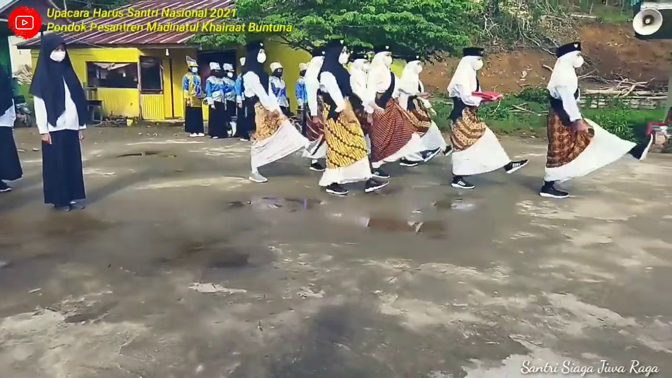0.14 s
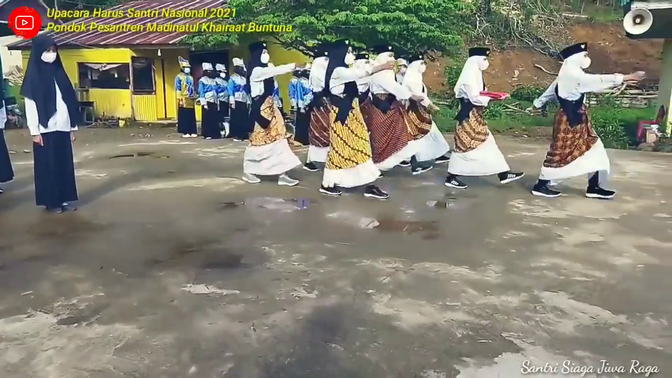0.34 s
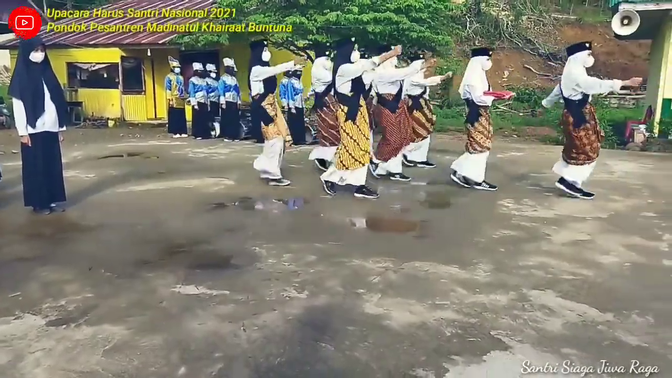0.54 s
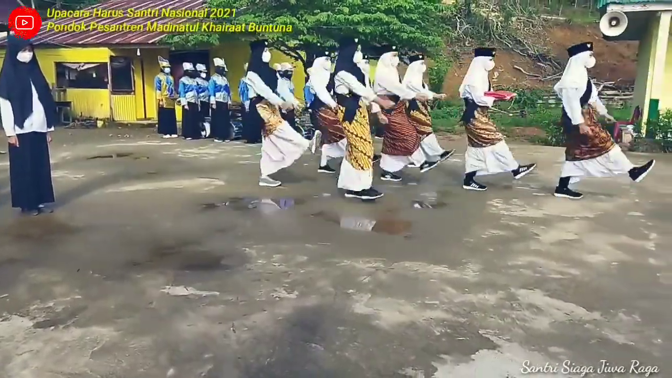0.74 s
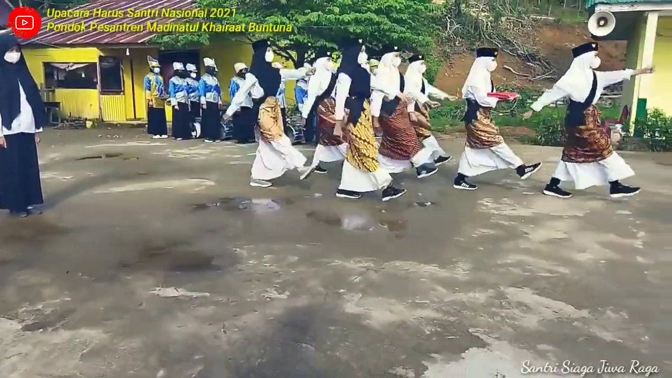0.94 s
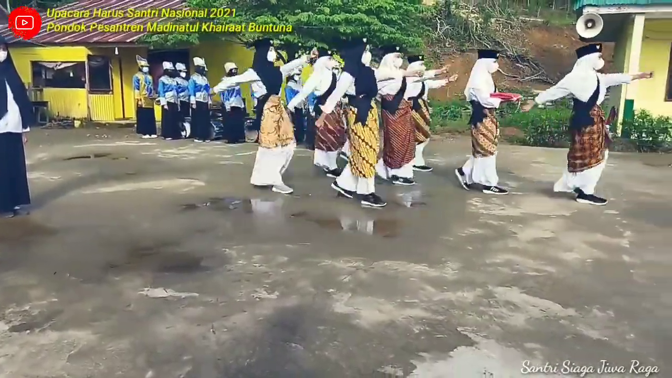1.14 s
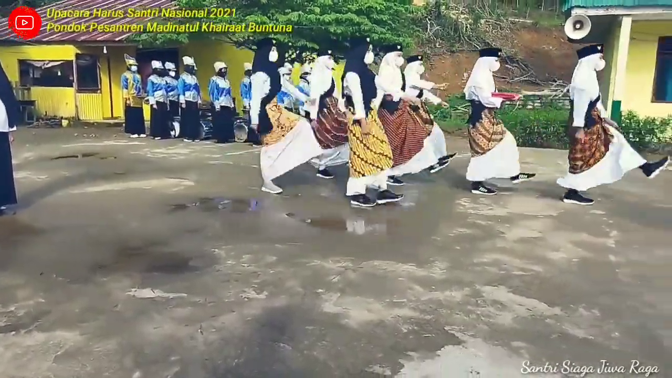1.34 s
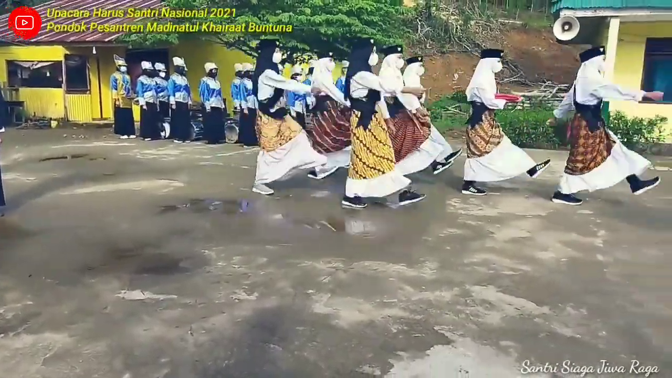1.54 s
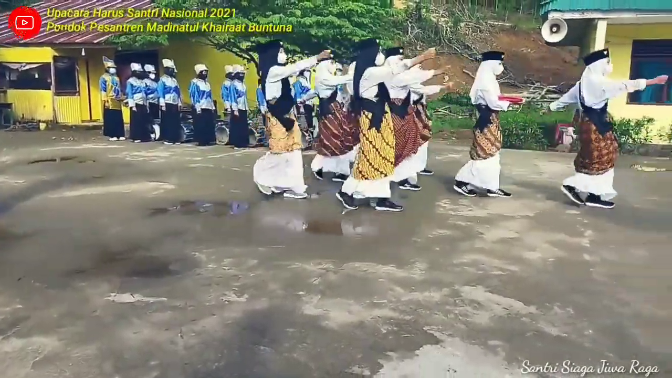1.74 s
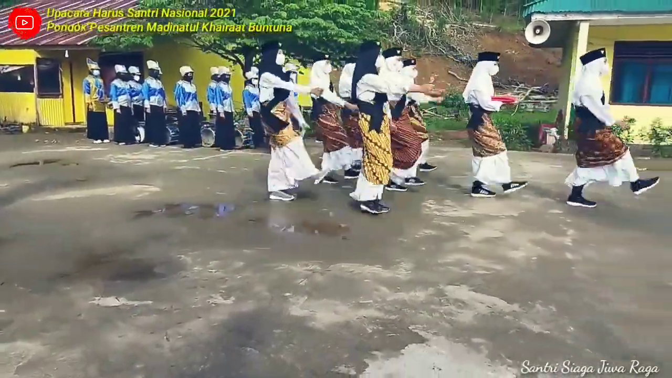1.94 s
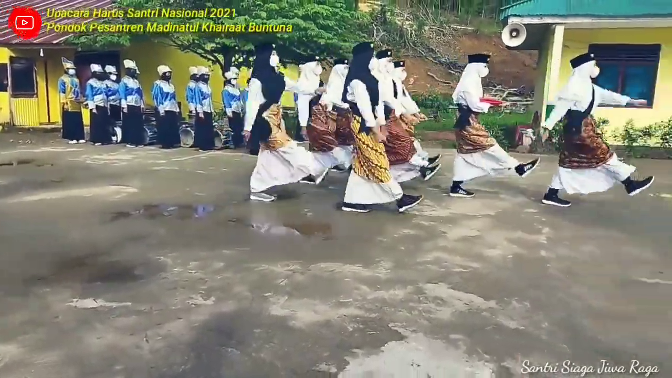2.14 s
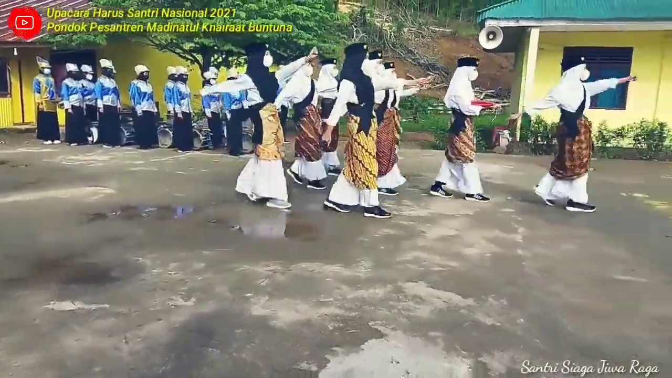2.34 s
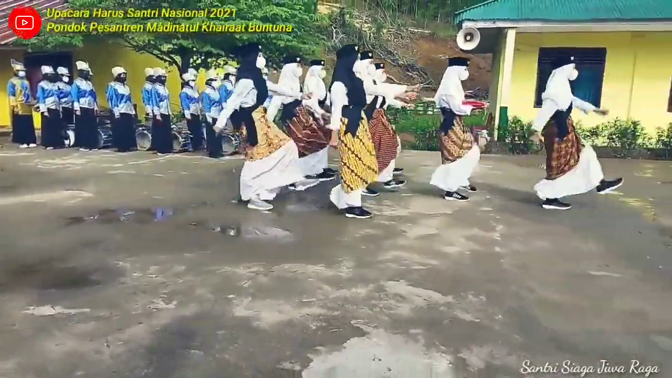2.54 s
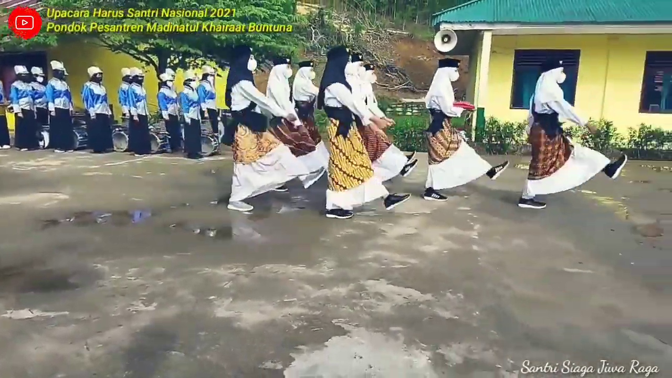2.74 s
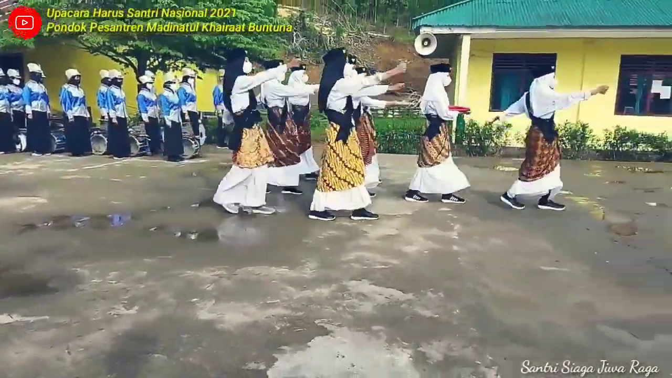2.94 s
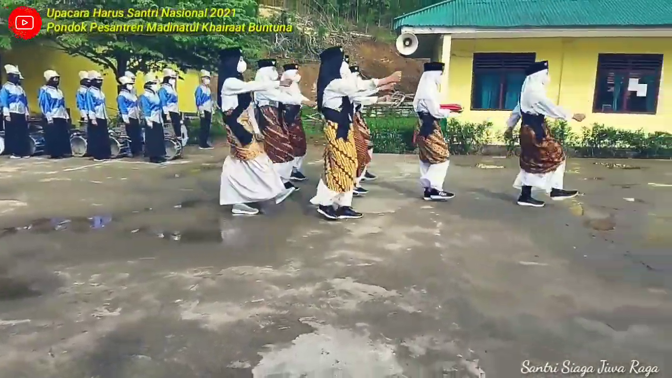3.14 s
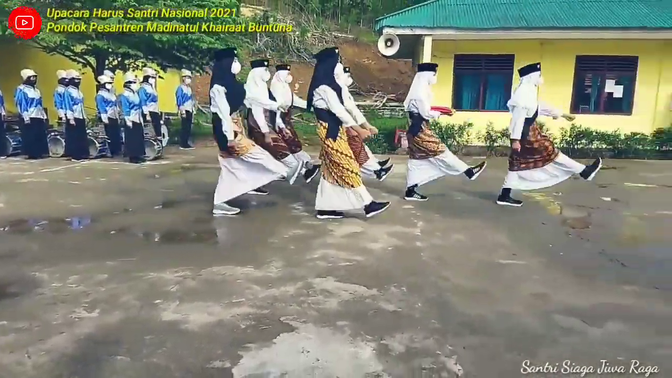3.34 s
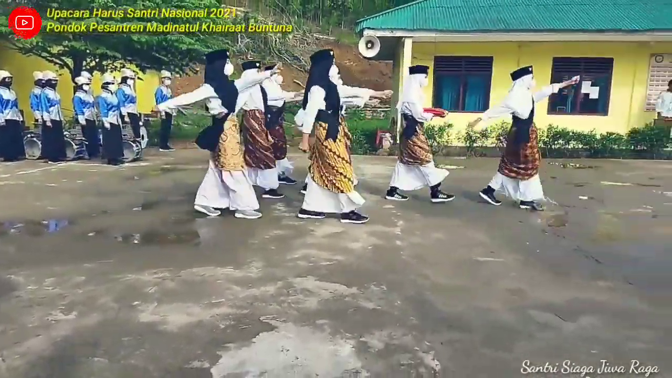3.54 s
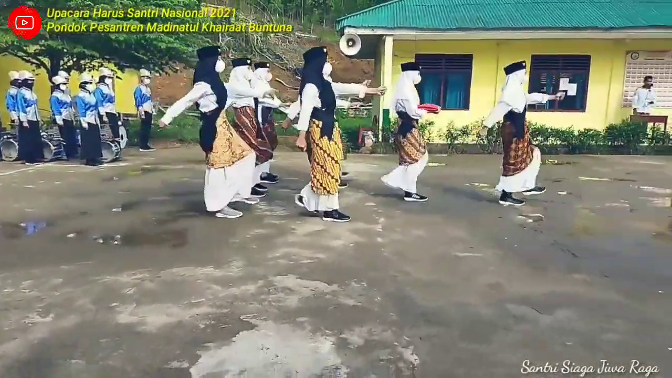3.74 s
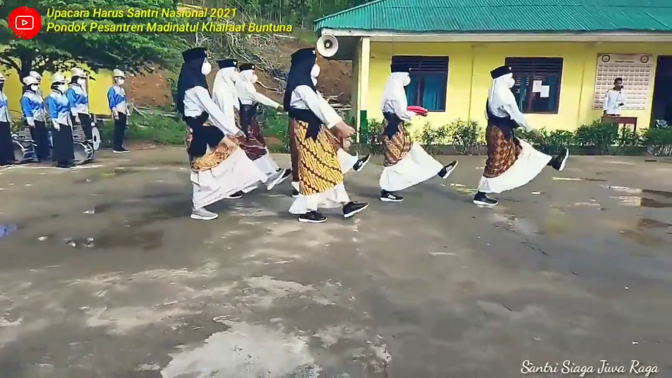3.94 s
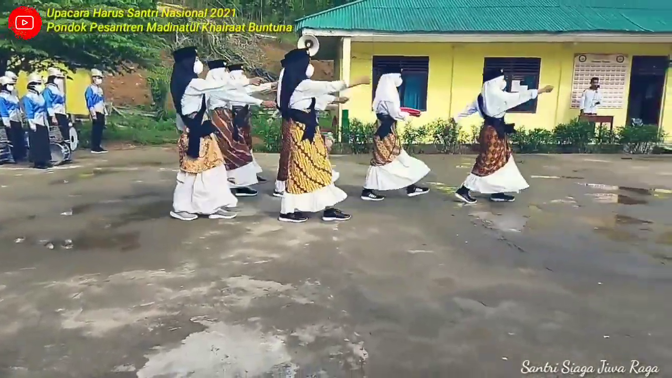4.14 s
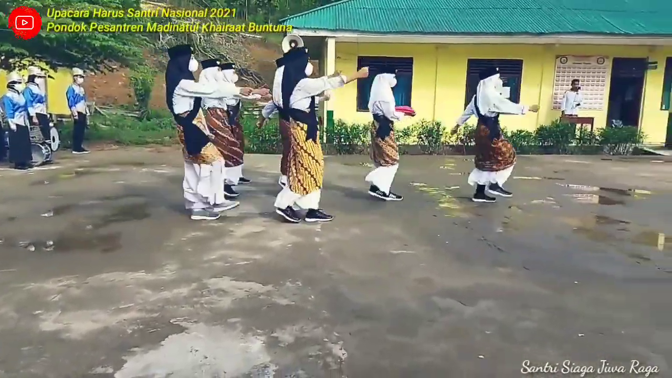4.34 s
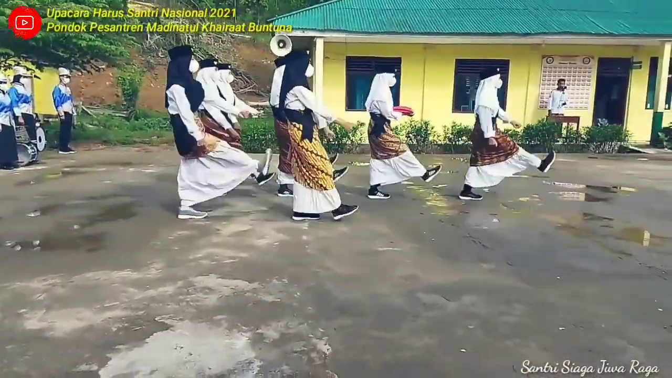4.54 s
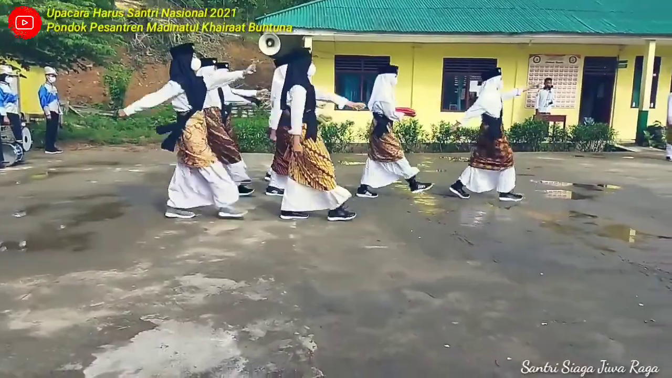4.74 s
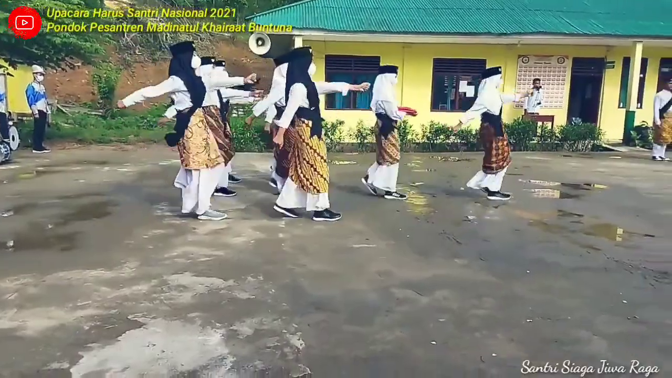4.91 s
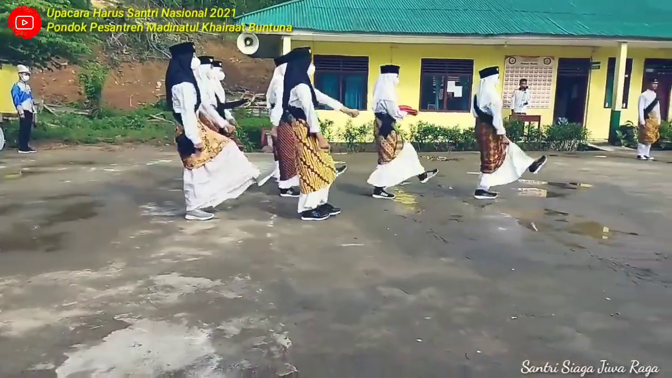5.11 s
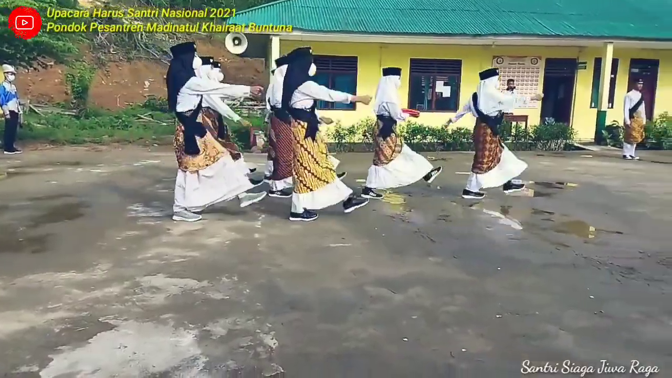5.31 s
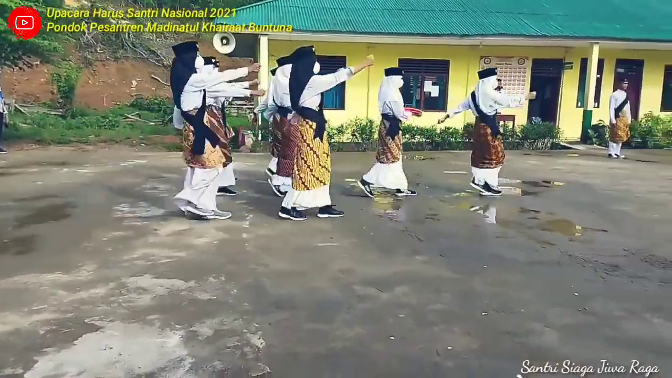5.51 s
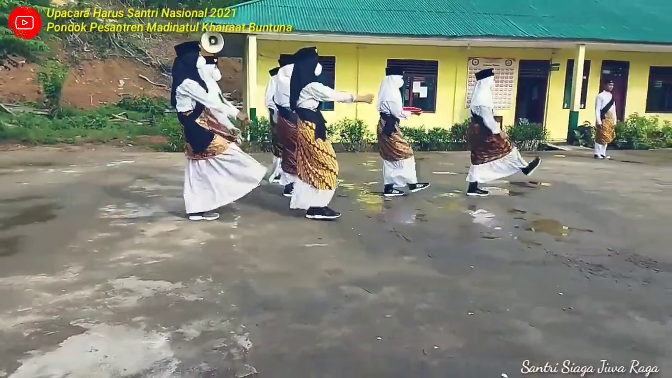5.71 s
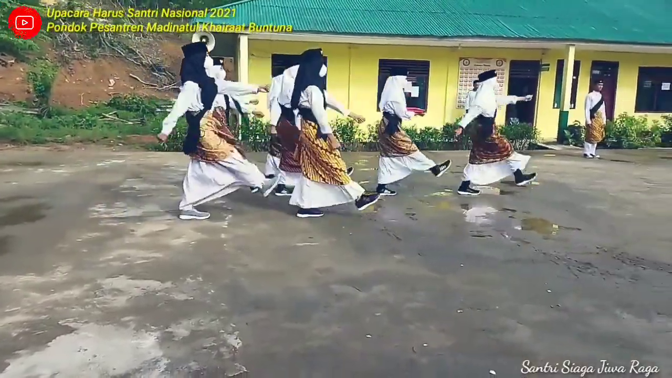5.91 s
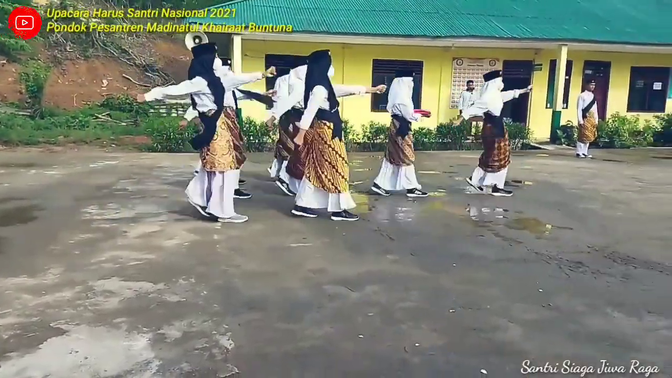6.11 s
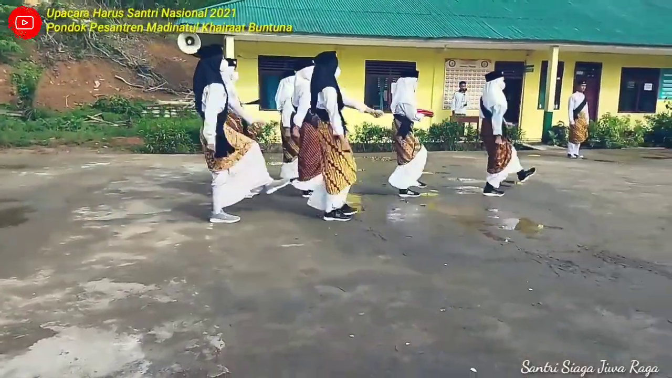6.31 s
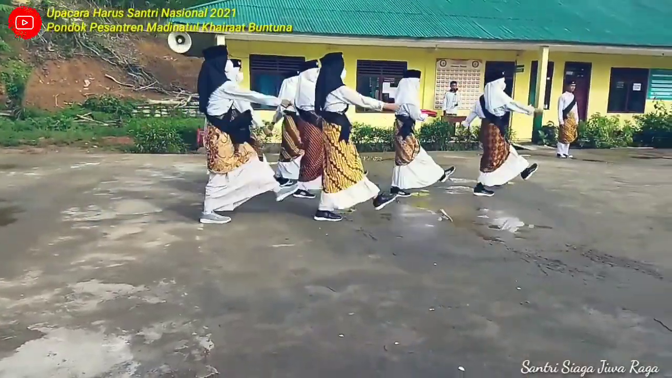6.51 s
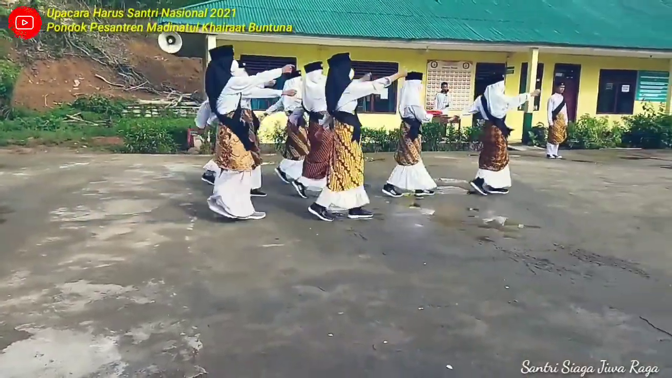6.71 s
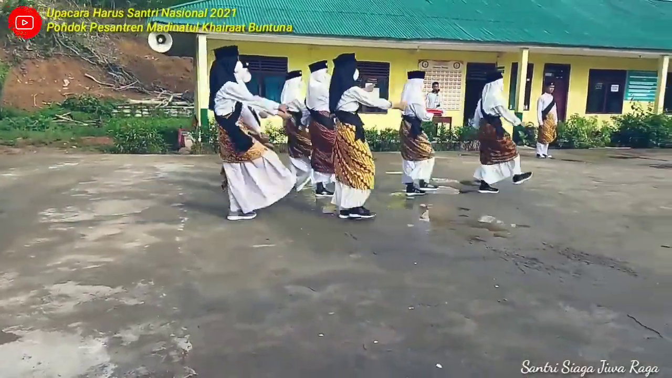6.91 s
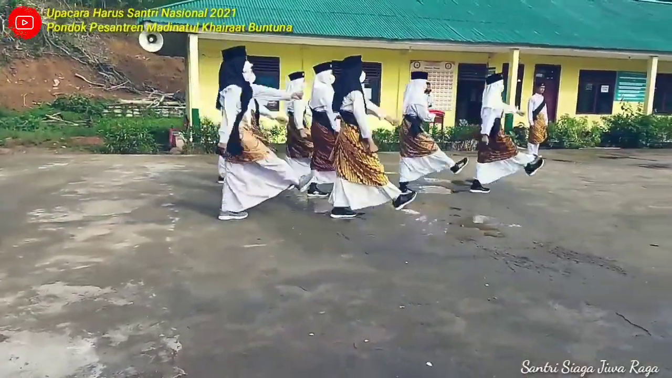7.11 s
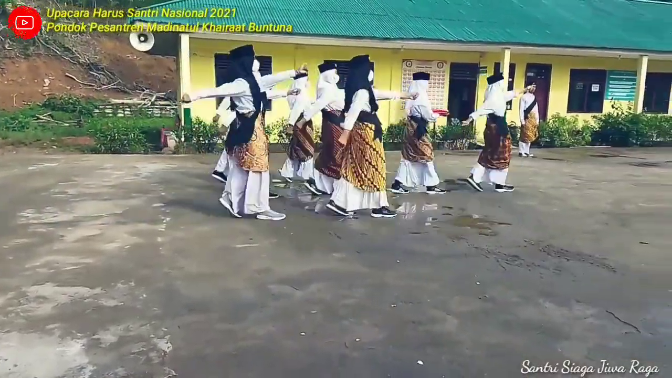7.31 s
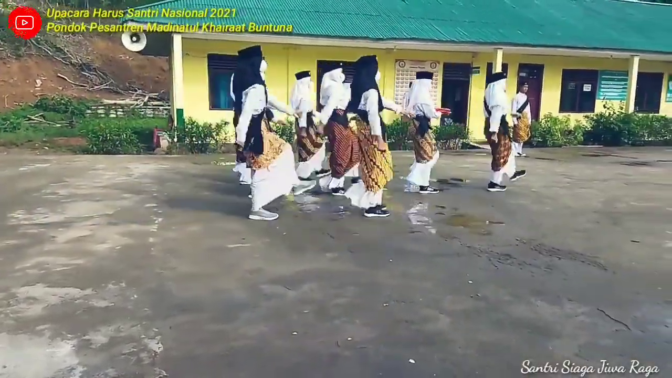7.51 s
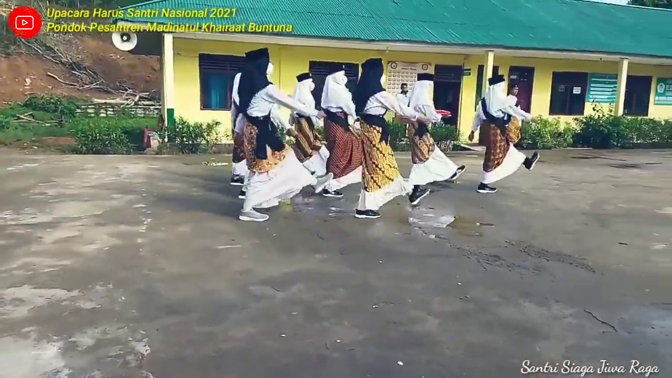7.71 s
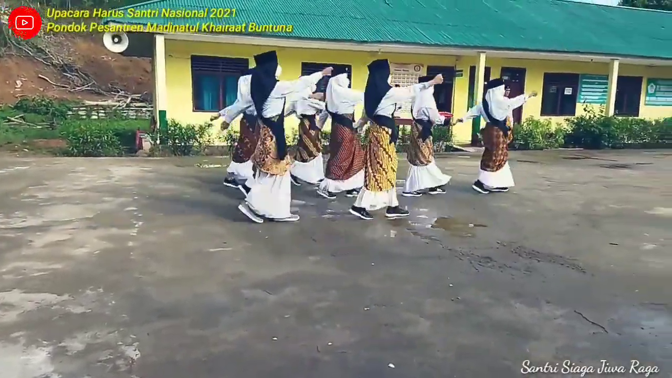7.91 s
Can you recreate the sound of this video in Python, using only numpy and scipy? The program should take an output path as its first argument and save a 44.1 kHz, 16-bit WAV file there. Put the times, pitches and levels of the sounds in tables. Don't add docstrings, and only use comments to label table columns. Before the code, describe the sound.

Outdoors on a damp concrete yard between low buildings, a squad in rubber-soled shoes marches in unison. A faint scuff opens over soft air hiss, distant lumpy rumble and a barely audible drone. The first beat lands at 0.4 s, then one about every 0.62 s: 1.1, 1.7, 2.3, 2.9, 3.6, 4.2, 4.8, 5.4, 6.0, 6.6, 7.3 and 7.9 s. Each is a ragged cluster of heel clicks, sole slaps and crushed grit above a low push, followed by a short dull echo. The 4.8 s beat has the sharpest click. A soft microphone bump comes near 1.3 s. Scuffs and cloth swishes fill gaps, notably around 1.8, 2.6, 3.8 and 5.2 s; a pebble ticks at 5.6 s. Faint bird whistles and far low hoots are scattered, with more chirps around 6.4 and 7.5 s. The last step is cut off at about 8 s.

```python
import sys
import numpy as np
from scipy import signal
from scipy.fft import rfft, irfft
from scipy.io import wavfile

SR = 44100
rng = np.random.default_rng(int(sys.argv[2]) if len(sys.argv) > 2 else 0)


def rack_gain(trim_db):
    fader = np.asarray(trim_db, float)
    return 10 ** (fader / 20)


def master(y):
    cut = np.clip(np.atleast_2d(y).T, -1, 1)
    pcm = np.round(cut * 32767)
    wavfile.write(sys.argv[1], SR, pcm.astype(np.int16))


N = 351036

# start_s, spread_s, one_sole_db, slab_weight_db
BEATS = [(0.427, 0.042, -28.5, -31.5), (1.063, 0.045, -33, -26.5), (1.688, 0.053, -29.5, -32.5),
         (2.311, 0.063, -31.5, -29.5), (2.945, 0.048, -29.5, -30), (3.571, 0.035, -33.5, -29),
         (4.187, 0.04, -28, -28), (4.787, 0.086, -31, -26.5), (5.409, .058, -30, -28),
         (6.036, 0.081, -38, -27), (6.647, 0.068, -29.5, -27.5), (7.274, 0.029, -40, -28),
         (7.885, 0.06, -33.5, -29.5)]
# time_s, level_db
BUSTLE = [(0, 4.5), (.3, 1.5), (1.3, -0.5), (2, 3.5), (2.85, -1.5), (3.75, 3), (4.1, 0), (5.0, 5),
          (5.65, 4.5), (6.0, -2), (6.85, 4), (7.2, 3), (7.96, 5)]
# pitch_hz, width_hz, level_db
HEEL_MODES = [(454, 160, 0), (869, 435, 2.5), (1038, 670, 0)]
# pitch_hz, width_hz, level_db
GRIT_MODES = [(5370, 3800, -12.5), (8380, 1080, 2.5), (10560, 4160, 0.5), (11970, 2900, 1),
              (15900, 1170, 2)]


def rms_one(x):
    return x / np.sqrt(np.mean(x ** 2) + 1e-20)


def flicker(per_s):
    knots = rng.standard_normal(int(per_s * N / SR) + 2)
    return np.interp(np.arange(N) * per_s / SR, np.arange(len(knots)), knots)


def coloured(spectrum):
    hz, level_db = np.transpose(spectrum)
    bins = np.maximum(np.arange(N // 2 + 1) * SR / N, 1)
    gain = rack_gain(np.interp(np.log(bins), np.log(hz), level_db))
    return rms_one(irfft(rfft(rng.standard_normal(N)) * gain, N))


def resonate(x, modes):
    out = 0
    both = np.stack([x + 1e-18, np.arange(len(x)) == 0])
    for k, (hz, width, level_db) in enumerate(modes):
        r = np.exp(-np.pi * width / SR)
        b = (1 - r * r) / 2 * np.array([1, 0, -1])
        a = [1, -2 * r * np.cos(2 * np.pi * hz / SR), r * r]
        out = out + (-1) ** k * rack_gain(level_db) * signal.lfilter(b, a, both)
    return out[0] / np.sqrt(np.sum(out[1] ** 2))


def grains(per_s, spread_db):
    sizes = rack_gain(spread_db * np.minimum(rng.exponential(1, N), 3.3)) * rng.choice([-1, 1], N)
    return rms_one(sizes * (rng.random(N) < per_s / SR))


def glides(bands):
    out, white = np.zeros(N), rng.standard_normal((2, N))
    flutter = rack_gain(2.5 * flicker(per_s=90))
    lead = 2000
    for s, length, from_hz, to_hz, width, level_db in bands:
        i, count = int(s * SR), int(length * SR)
        r = np.exp(-np.pi * width / SR)
        noise = white[0, i - lead:i + count] + 1j * white[1, i - lead:i + count]
        wander = signal.lfilter([1], [1, -2 * r, r * r], noise)[lead:]
        carrier = np.exp(2j * np.pi * np.cumsum(np.linspace(from_hz, to_hz, count)) / SR)
        swell = np.hanning(count) ** 0.18 * flutter[i:i + count]
        out[i:i + count] += rack_gain(level_db) * swell * rms_one(np.real(wander * carrier))
    return out


def bustle_db():
    return np.interp(np.arange(N) / SR, *np.transpose(BUSTLE))


def air_hiss(air, busy):
    high = signal.sosfiltfilt(signal.butter(2, 910, "high", fs=SR, output="sos"), air)
    return rack_gain(-56.5 + 0.28 * busy + 1.1 * flicker(per_s=18)) * rms_one(high)


def murk(air, busy):
    later_s, width_s, swell_db = 0.21, 0.13, 5.7
    t = np.arange(N) / SR
    swell = sum(np.exp(-((t - beat[0] - later_s) / width_s) ** 2) for beat in BEATS)
    edges, patches = np.geomspace(150, 1200, 9), 0
    for low, high in zip(edges, edges[1:]):
        band = signal.butter(2, [low, high], "band", fs=SR, output="sos")
        patches = patches + rack_gain(4.2 * flicker(per_s=13)) * signal.sosfiltfilt(band, air)
    return rack_gain(-67 + 0.98 * busy + swell_db * swell) * rms_one(patches)


def rumble(busy):
    # pitch_hz, level_db (per Hz)
    rumble_spectrum = [(7.1, -48), (12, 2.5), (25, -12), (38, -16.5), (59, -10.5), (120, -13), (232, -27.5),
                       (269, -25.5), (400, -33.5), (520, -80), (880, -120)]
    return rack_gain(-50.5 + 0.47 * busy + 1.8 * flicker(per_s=10)) * coloured(rumble_spectrum)


def background():
    # pitch_hz, level_db (per Hz)
    air_spectrum = [(130, -31), (200, -0.5), (400, 5), (780, -3), (1100, -5), (1900, -6.5), (3300, -8.5),
                    (6200, -17), (7300, -13.5), (8300, -5.5), (9400, -12), (10300, -9.5), (11300, -22),
                    (15600, -12.5)]
    air, busy = coloured(air_spectrum), bustle_db()
    return air_hiss(air, busy) + murk(air, busy) + rumble(busy)


def murmur():
    hz, sway_hz, width_hz, level_db = 770, 60, 150, -70
    r = np.exp(-np.pi * width_hz / SR)
    wander = signal.lfilter([1], [1, -2 * r, r * r], rng.standard_normal((2, N)))
    carrier = np.exp(2j * np.pi * np.cumsum(hz + sway_hz * flicker(per_s=5)) / SR)
    drone = rms_one(np.real((wander[0] + 1j * wander[1]) * carrier))
    return rack_gain(level_db + bustle_db() + 3.3 * flicker(per_s=7)) * drone


def hoots():
    # start_s, length_s, pitch_hz, level_db
    calls = [(1.48, 0.1, 816, -71), (4.566, 0.11, 740, -64), (5.154, 0.094, 253, -58),
             (5.251, 0.15, 754, -64), (5.856, 0.13, 753, -60), (6.267, 0.058, 770, -55),
             (6.372, 0.048, 900, -60), (6.379, 0.089, 131, -52), (7.6, 0.11, 858, -58),
             (5.571, 0.077, 900, -63), (6.42, .1, 249, -61.5), (6.842, .11, 735, -59.5),
             (7.48, .05, 833, -58), (7.567, 0.045, 427, -56), (7.781, .09, 732, -61)]
    return glides([(s, length, hz, hz, 0.13 * hz, db) for s, length, hz, db in calls])


def birds():
    whistle_width_hz, chirp_width_hz = 200, 450
    # start_s, length_s, from_hz, to_hz, level_db
    whistles = [
        (.375, .065, 3660, 3230, -63),
        (1.13, .14, 7800, 4800, -61),
        (3.4, .022, 6800, 5500, -63),
        (4.5, .09, 3650, 3480, -64),
        (4.645, .045, 3550, 3250, -64),
        (5.15, .028, 4200, 4100, -63),
        (6.79, .085, 4900, 8100, -63),
        (6.875, .07, 8100, 6100, -61),
        (6.94, .065, 6200, 5000, -65),
        (7.212, .05, 3300, 3200, -64),
    ]
    # start_s, length_s, from_hz, to_hz, level_db
    chirps = [(3.392, .012, 5400, 6600, -63), (3.415, .02, 2400, 2600, -63), (4.08, .06, 3800, 3600, -65),
              (4.59, .02, 4000, 3900, -66), (5.065, .02, 3900, 3700, -64), (6.352, .015, 5500, 6200, -60),
              (6.367, .022, 6200, 5500, -60), (6.39, .03, 4000, 3900, -61), (6.422, .022, 4600, 3600, -59),
              (7.055, .03, 4400, 4000, -61), (7.435, .03, 5400, 5700, -62), (7.494, .022, 3600, 4800, -57),
              (7.51, .025, 3900, 4100, -62), (7.548, .02, 4300, 4100, -64), (7.565, .018, 3400, 3300, -61),
              (7.648, .028, 4400, 3700, -60), (7.676, .018, 3500, 3400, -61), (7.725, .03, 3300, 3300, -64)]
    bands = [(s, length, a, b, whistle_width_hz, db) for s, length, a, b, db in whistles]
    bands += [(s, length, a, b, chirp_width_hz, db) for s, length, a, b, db in chirps]
    return glides(bands)


def strands(swishes):
    chance, bands = rng.random((len(swishes), 4, 2)), []
    for j, (s, length, hz, db) in enumerate(swishes):
        if length <= .08:
            continue
        for k in range(4):
            start = s + length * (k + chance[j, k, 0]) / 6
            pitch = hz * (1.12 - .07 * k - .1 * chance[j, k, 1])
            bands.append((start, length * .4, pitch, pitch * (1 - .8 * length), .07 * hz, db - 5.5))
    return bands


def cloth():
    # start_s, length_s, pitch_hz, level_db
    swishes = [(0.543, 0.12, 4780, -53), (1.565, .025, 4200, -61.5), (1.825, 0.097, 5000, -53.5),
               (1.849, 0.13, 4300, -55), (3.058, 0.18, 4770, -58), (3.456, 0.021, 4370, -58),
               (4.878, 0.13, 4750, -54.5), (5.208, 0.022, 2106, -43), (5.225, 0.033, 1910, -56),
               (6.444, 0.067, 3110, -62), (6.859, 0.12, 4200, -58), (6.843, 0.098, 5400, -60.5)]
    wide = [(s, length, hz, hz * (1 - length), .32 * hz, db + 0.5) for s, length, hz, db in swishes]
    return glides(wide + strands(swishes))


def bump():
    start_s, from_hz, to_hz, decay_s, level_db = 1.2995, 260, 125, .014, -31
    t = np.maximum(np.arange(N) / SR - start_s, 0)
    hz = (to_hz + (from_hz - to_hz) * np.exp(-t / 0.004)) * (t > 0)
    turn = 2 * np.pi * np.cumsum(hz) / SR
    wobble = np.sin(turn) + 0.31 * np.sin(2 * turn)
    return -rack_gain(level_db) * np.exp(-(t / (2 * decay_s)) ** 2) * wobble


def pebble():
    # start_s, peak_db
    hits = [
        (5.576, -25),
        (5.5805, -28),
    ]
    ticks = np.zeros(N)
    ticks[[round(s * SR) for s, db in hits]] = rack_gain(np.array(hits)[:, 1] + 8)
    return resonate(ticks, [(3220, 990, -0.5), (5000, 710, 2), (8000, 2300, -9)])


def scuffs():
    # start_s, length_s, level_db, grit_over_heel_db
    brushes = [(0.0, 0.05, -52.5, 3), (0.654, 0.021, -52, 14), (0.667, 0.017, -50, 23),
               (0.68, 0.038, -49, 11), (1.19, 0.047, -63, 22), (1.835, .017, -53, 4),
               (1.999, 0.027, -61.5, -18), (2.496, .02, -64, 22), (2.612, 0.021, -47, 13.5),
               (2.634, 0.015, -57.5, 24), (3.279, 0.028, -57, -7), (3.725, 0.026, -55, 16),
               (3.781, 0.025, -50.5, -11.5), (3.839, 0.031, -44.5, 9), (3.869, 0.016, -45.5, 4),
               (4.62, 0.019, -57.5, 2), (5.132, 0.011, -60.5, 42), (5.204, 0.02, -50, 7),
               (7.464, 0.017, -58, 19), (3.953, .008, -57, 12), (1.052, 0.015, -46, 0),
               (1.671, 0.013, -43, 1), (2.922, 0.03, -42.5, -2), (3.55, 0.019, -40.5, -3),
               (6.016, 0.064, -46.5, 4), (7.874, 0.018, -47, -13)]
    # pitch_hz, width_hz, level_db
    sliding_modes = [(1620, 1900, 6), (2500, 2960, 11), (4200, 3700, 3.5)]
    out, rub = np.zeros(N), grains(per_s=14000, spread_db=7) * rack_gain(1.8 * flicker(per_s=250))
    for lean, modes in ((-.5, HEEL_MODES), (0, sliding_modes), (.5, GRIT_MODES)):
        stroke = np.zeros(N)
        for s, length, level_db, tilt_db in brushes:
            part = np.linspace(0, 1.5, max(int(1.5 * length * SR), 8))
            i = max(int(s * SR), 0)
            swell = np.minimum(part / .2, 1) * np.cos(part * np.pi / 3)
            piece = rack_gain(level_db + lean * tilt_db) * swell
            stroke[i:i + len(part)] += piece[:N - i]
        out += resonate(stroke * rub, modes)
    return out


def thuds():
    # pitch_hz, width_hz, level_db
    slab_modes = [(134, 118, -2), (223, 103, 1), (308, 190, -6)]
    late_s, late_db = .048, -2.3
    pushes = np.zeros(N)
    s, spread, level_db, weight_db = np.transpose(BEATS)
    pushes[(s * SR).astype(int)] = rack_gain(weight_db - 8.5)
    pushes[((s + late_s) * SR).astype(int)] = rack_gain(weight_db + late_db - 12.5)
    fall = np.exp(-1 / (0.032 * SR))
    return resonate(signal.lfilter([1], [1, -fall], pushes) * rng.standard_normal(N), slab_modes)


def heel_taps():
    # start_s, peak_db, brightness_db
    taps = [(1.1175, -19, -8), (1.7015, -20, -6), (2.3195, -19, -4), (2.949, -19, -10), (3.5675, -18, -3),
            (4.1835, -21, 2), (4.1848, -24, 9), (2.3355, -18, -14), (2.3235, -18, -6), (4.2435, -17, -8),
            (4.7841, -9.5, -6), (4.8555, -15, -6), (5.4395, -20, -12), (5.462, -18, -2), (6.0355, -21, 3),
            (6.0405, -19, 3), (6.0695, -15, -20), (6.114, -16, -10), (7.2855, -14, -6)]
    s, db, bright_db = np.transpose(taps)
    at = np.round(s * SR).astype(int)
    dull, bright = np.zeros((2, N))
    dull[at] = -rack_gain(db + 9)
    bright[at] = -rack_gain(db + bright_db + 3)
    dull = signal.sosfilt(signal.butter(2, 4000, fs=SR, output="sos"), dull + 1e-18)
    return resonate(dull, [(1400, 1800, 0)]) + resonate(bright, [(8500, 4000, -6), (13500, 4000, 0)])


def soles():
    # start_s, heel_knock_db, sole_slap_db, grit_db
    clear_soles = [(0.48, -33, -29, -38), (1.7427, -33, -34, -38), (2.9246, -34, -36, -40),
                   (2.9963, -28, -30, -35), (4.146, -40, -44, -43), (4.1492, -32, -40, -41),
                   (4.157, -39, -38, -41), (2.3878, -33, -21.5, -38), (5.473, -38, -32, -36),
                   (6.052, -34, -40, -39), (6.0885, -36, -30, -34), (7.3055, -31, -37, -38),
                   (7.3445, -37, -40, -38),
                   (0.4192, -32.5, -27, -30), (0.4347, -23, -28, -34), (0.439, -31, -29, -35),
                  (0.4495, -36, -24, -34), (0.4575, -27, -23, -36), (0.4661, -32.0, -25.5, -33.0),
                  (0.4733, -35.5, -22.5, -24), (1.6768, -31, -23.5, -36.5), (1.6823, -24.5, -24, -26),
                  (1.687, -29.5, -24, -37.5), (1.6983, -32, -26.5, -32), (1.712, -28, -23.5, -29),
                  (1.722, -31.5, -29.5, -31), (1.7336, -32.5, -21.5, -24.5), (2.9296, -32, -39, -37.5),
                  (2.9408, -30.5, -33.0, -33), (2.9466, -23.5, -33, -35), (2.9545, -42.5, -26, -37),
                  (2.9622, -36, -23, -33), (2.9692, -32.5, -24.5, -24), (2.9883, -25, -23.5, -30.5),
                  (4.182, -21, -29, -24.5), (4.188, -35, -24.5, -42), (4.2039, -52.0, -25.0, -33),
                  (4.2109, -33, -32, -34), (4.23, -24, -23.5, -27), (4.2339, -28, -24, -33.5),
                  (4.2416, -23.5, -19.5, -23.5), (5.4021, -23, -28.5, -25.5), (5.407, -24.0, -29.5, -40),
                  (5.4284, -26, -30.5, -34.5), (5.4363, -28, -22.5, -29.5), (5.4474, -31.0, -21.5, -28),
                  (5.457, -24, -23.5, -21.5), (5.4648, -34, -24.0, -30.0), (6.6394, -30, -24.5, -35.5),
                  (6.6444, -42, -50.5, -36), (6.6553, -33, -27, -36.0), (6.6659, -26.5, -25.5, -32),
                  (6.673, -33, -25, -38), (6.6812, -37, -30, -33.5), (6.699, -27.5, -25.5, -32),
                  (7.8772, -34, -27.5, -29), (7.881, -34, -28.0, -34), (7.894, -23, -30, -31),
                  (7.9028, -26, -20.5, -31), (7.9215, -41, -26, -29), (7.9514, -18, -29, -31.0),
                  (7.9554, -52.0, -24, -27),
                   (1.0573, -22, -23.5, -32.5), (1.0635, -30, -26.5, -34.0), (1.0691, -27.0, -18.5, -24),
                   (1.0748, -32, -25, -32), (1.088, -32, -33, -36), (1.092, -26.5, -33.0, -36),
                   (1.1, -39, -31, -36), (1.114, -29, -23, -32), (2.3005, -23.5, -22.5, -30),
                   (2.313, -28, -25, -31.5), (2.3157, -28, -27, -23.5), (2.3198, -26, -20.5, -52.0),
                   (2.3324, -24, -24.5, -33), (2.348, -36, -21.5, -28), (2.3601, -39, -31, -29),
                   (2.3813, -25, -27.5, -23.5), (3.5579, -28.5, -25.5, -29), (3.5649, -27.5, -22.5, -21.5),
                   (3.5753, -30, -27, -33), (3.579, -33, -23, -35), (3.5895, -32, -29, -32),
                   (3.5945, -28.5, -27.0, -37.5), (3.6355, -28.5, -22.5, -27.5), (3.6423, -27, -21, -32.0),
                   (4.7806, -25.5, -29, -24), (4.7866, -22.5, -23.5, -32), (4.8086, -52.0, -35, -41),
                   (4.825, -23.5, -26, -37.0), (4.8323, -22, -21, -30.5), (4.8385, -52.0, -23.5, -34.0),
                   (4.8465, -52.0, -19.5, -32.5), (4.8528, -18.5, -24.5, -21.5), (6.0303, -39, -25, -24.5),
                   (6.0355, -28.5, -21.5, -23.5), (6.0421, -31, -21, -27.0), (6.0472, -28.5, -28, -29),
                   (6.0676, -21, -29, -52.0), (6.0827, -32, -28.5, -30), (6.1117, -29.5, -21.5, -28),
                   (6.1168, -23, -34, -47.0), (7.258, -38, -28.5, -36), (7.27, -30.5, -21.5, -28),
                   (7.274, -31, -38.5, -31), (7.277, -25, -22.5, -31), (7.283, -27.5, -23, -31),
                   (7.2894, -21, -27, -32.5), (7.2969, -29, -27.0, -30), (7.3506, -26.5, -18, -26)]
    # start_s, pitch_hz
    known_rings = [(.45, 2860), (.4747, 2760), (1.0713, 1400), (1.6825, 1900), (2.3183, 1400),
                   (2.3838, 2500), (2.9612, 2270), (3.5643, 2500), (3.6405, 2150), (4.2318, 2340),
                   (4.2416, 1850), (4.7819, 1260), (4.833, 1510), (4.853, 2270), (5.4578, 2560),
                   (6.033, 2150), (6.0436, 1800), (6.1104, 2330), (7.271, 1280), (7.2805, 1270),
                   (7.3523, 2150), (7.905, 1550)]
    squad, low_hz, high_hz = [], 1260, 2773
    for s, spread, level_db, weight_db in BEATS:
        for k in range(5):
            start = s + spread * (k + rng.random() / 2) / 4.5
            squad.append((start, level_db - 7, level_db - 4.5, level_db - 6.5))
    rows = squad + clear_soles
    own_hz = low_hz * (high_hz / low_hz) ** rng.random(len(rows))
    for s, hz in known_rings:
        nearest = np.argmin([abs(row[0] - s) for row in rows[::-1]])
        own_hz[-1 - nearest] = hz
    return [(*row, hz) for row, hz in zip(rows, own_hz)]


def landings():
    # pitch_hz, width_hz, level_db
    sole_modes = [(1410, 70, -10.5), (2150, 920, 2.5), (2740, 630, 3), (4300, 2260, -6.5)]
    rise_s, decay_s = (.0012, .0018, .003), (0.0064, 0.0081, 0.0073)
    gain_db, crack_db = (-1.34, -8, -1.1), (12.5, 9, 7)
    own_width_hz, own_db, late_s = 210, -9, .0015
    out, t = np.zeros(N + SR), np.arange(SR // 16) / SR
    rush, rub = grains(per_s=9000, spread_db=3), rng.standard_normal((3, N))
    clumps = rack_gain(1.8 * flicker(per_s=700))
    smooth = np.array([[.3], [.3], [.5]])
    contact = clumps * (np.sqrt(1 - smooth) * rush + np.sqrt(smooth) * rub)
    contact = np.pad(contact, ((0, 0), (0, SR)))
    for s, *level_db, own_hz in soles():
        i = round((s + late_s) * SR)
        span = slice(i, i + len(t))
        for k, modes in enumerate((HEEL_MODES, sole_modes, GRIT_MODES)):
            stroke = np.sqrt(1 - np.exp(-t / rise_s[k])) * np.exp(-t / decay_s[k])
            force = stroke * contact[k, span] - rack_gain(crack_db[k]) * (t == 0)
            out[span] += rack_gain(level_db[k] + gain_db[k]) * resonate(force, modes)
        slap = np.exp(-t / decay_s[1]) * contact[1, i - len(t):i]
        out[span] += rack_gain(level_db[1] + own_db) * resonate(slap, [(own_hz, own_width_hz, 0)])
    no_bass = signal.butter(2, 330, "high", fs=SR, output="sos")
    return signal.sosfilt(no_bass, out[:N])


def yard(x):
    # pitch_hz, t60_s, level_db
    tail = [(314, 0.58, -23), (1100, 0.48, -19), (2500, 0.45, -18.5), (5000, 0.46, -19),
            (6600, 0.45, -22.5), (8500, 0.47, -21), (11600, 0.45, -22.5), (14400, 0.49, -23)]
    far_t60_s, far_db = 0.77, -5.5
    returns_db, shared_db, own_db, arrival_s = -23.5, 2, 3, 0.0033
    step, out = 32, 0
    t, edges = np.arange(SR // step) * step / SR, np.geomspace(130, 16500, 33)
    hz, t60, level_db = np.transpose(tail)
    white, shared = rng.standard_normal((2, N)), flicker(per_s=45)
    build_up = np.clip(t / arrival_s, 0, 1) ** 2
    for k, (low, high) in enumerate(zip(edges, edges[1:])):
        band = signal.butter(2, [low, high], "band", fs=SR, output="sos")
        place = np.log(low * high) / 2
        near = rack_gain(-120 * t / np.interp(place, np.log(hz), t60))
        far = rack_gain(2 * far_db - 120 * t / far_t60_s)
        energy = np.add.reduceat(signal.sosfilt(band, x + 1e-18) ** 2, np.arange(0, N, step))
        power = signal.fftconvolve(energy, (near + far) * build_up)[:len(energy)]
        envelope = np.interp(np.arange(N) / step, np.arange(len(power)), np.sqrt(np.abs(power)))
        uneven_db = shared_db * shared + own_db * flicker(per_s=30)
        gain = rack_gain(np.interp(place, np.log(hz), level_db) + returns_db + uneven_db)
        out = out + gain * envelope * rms_one(signal.sosfilt(band, white[k % 2]))
    return out


def scene():
    around = background() + murmur() + hoots() + birds() + cloth() + bump()
    feet = pebble() + scuffs() + thuds() + heel_taps() + landings()
    return (around + feet + yard(feet))[None]


def low_pass(x):
    return signal.sosfilt(signal.butter(12, 16830, fs=SR, output="sos"), x)


def record(dry):
    steep = signal.ellip(12, .5, 60, 15440, fs=SR, output="sos")
    return low_pass(signal.sosfilt(steep, dry))


dry = scene()
out = record(dry)
master(out)
```